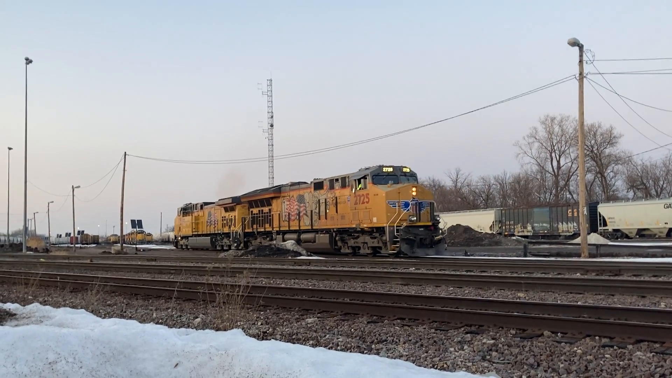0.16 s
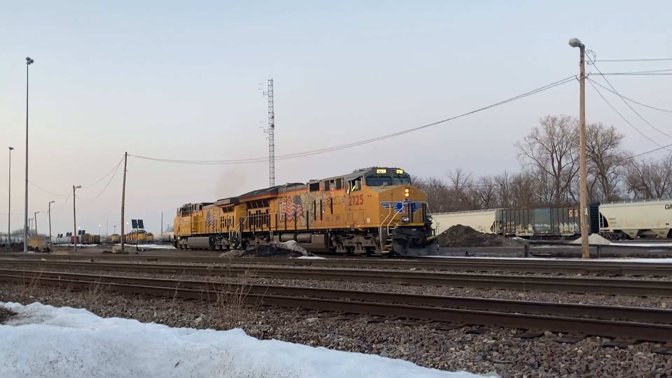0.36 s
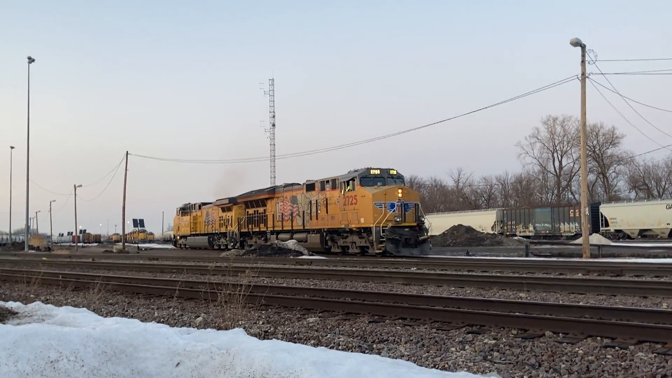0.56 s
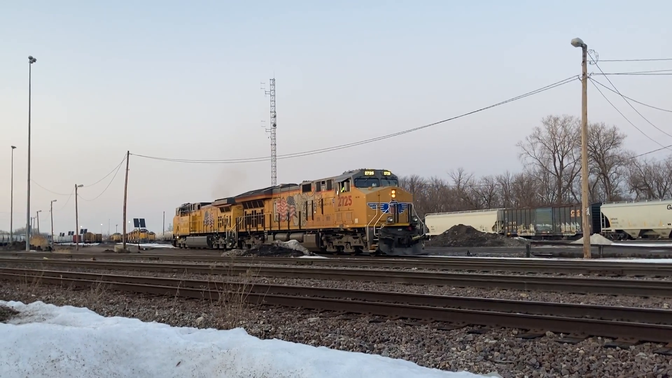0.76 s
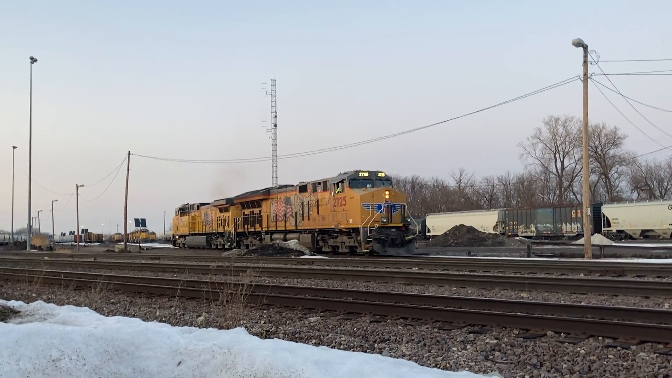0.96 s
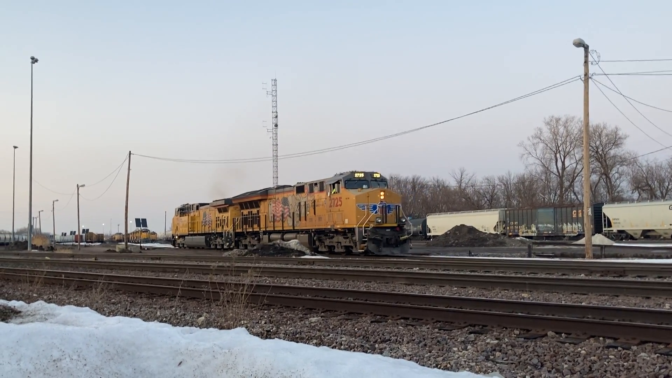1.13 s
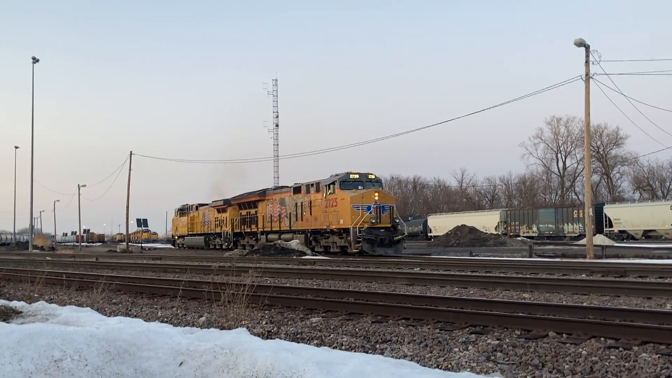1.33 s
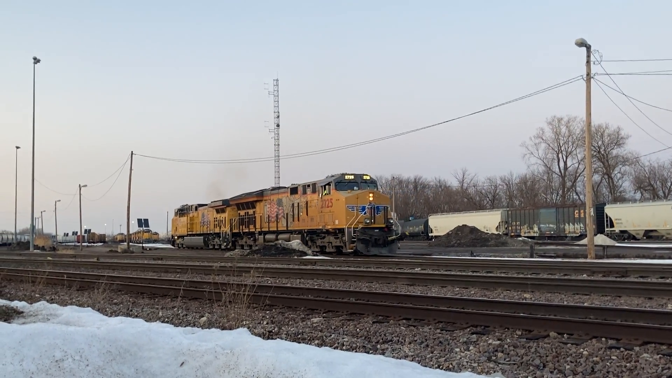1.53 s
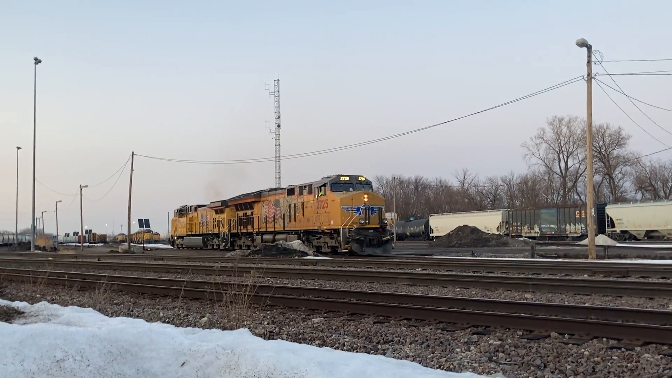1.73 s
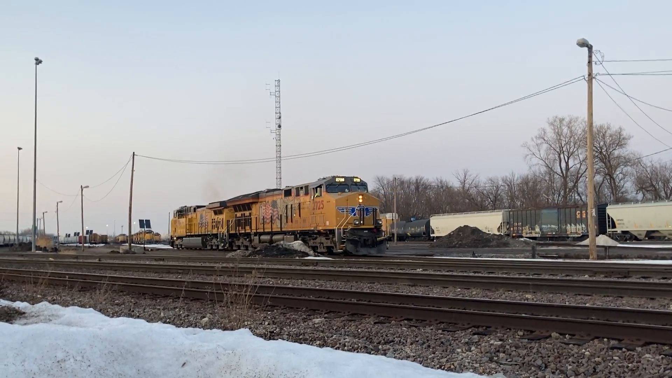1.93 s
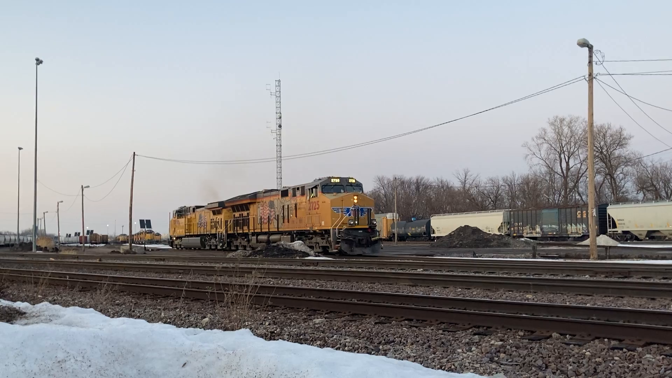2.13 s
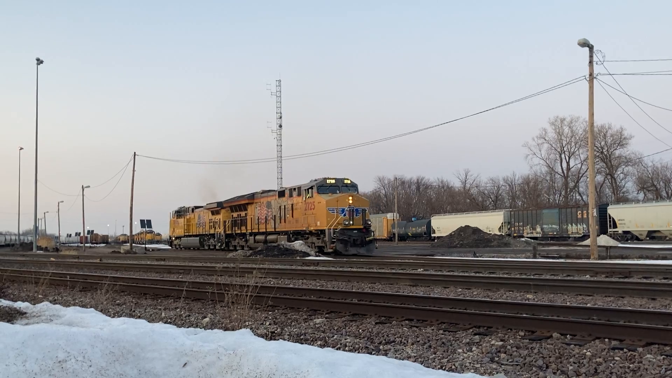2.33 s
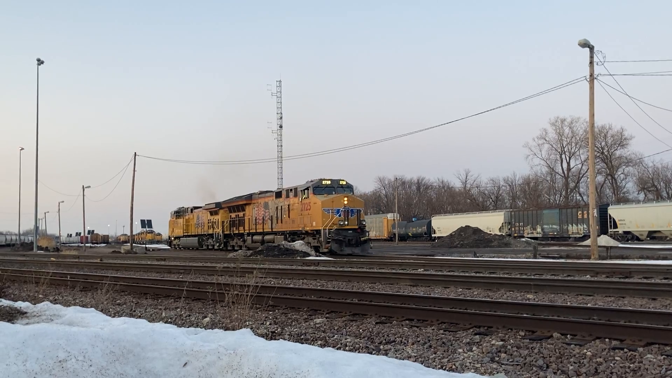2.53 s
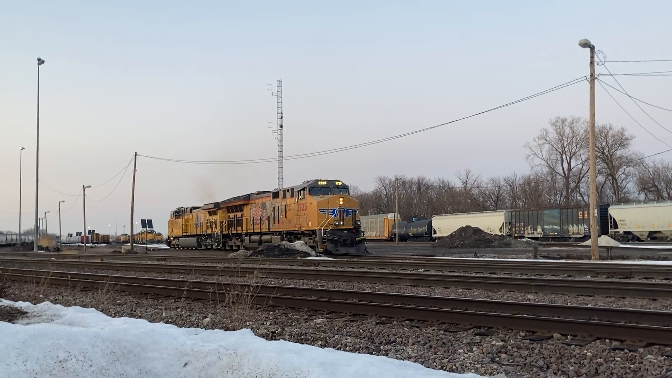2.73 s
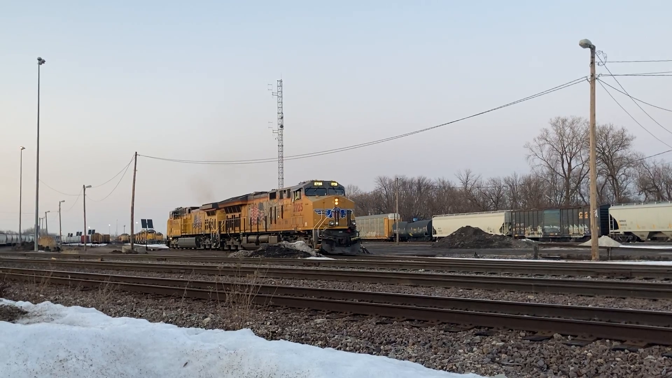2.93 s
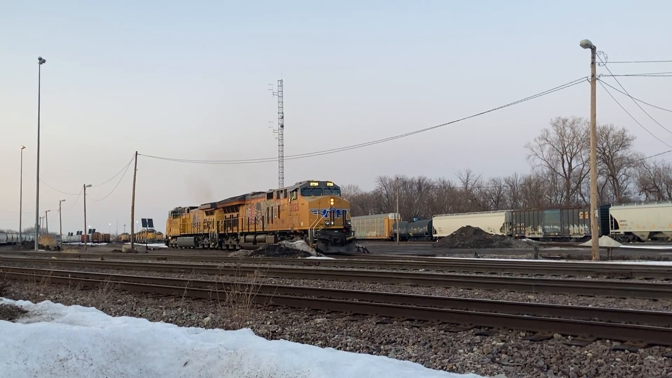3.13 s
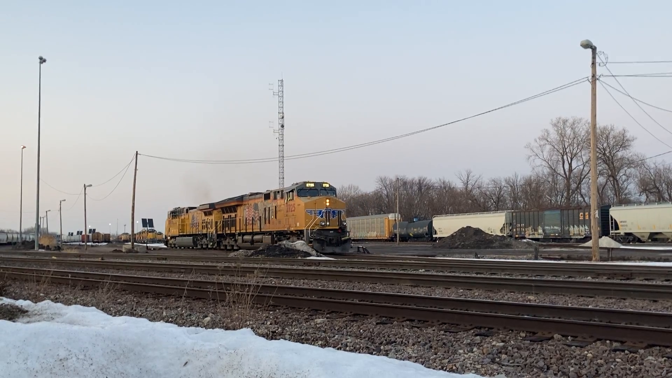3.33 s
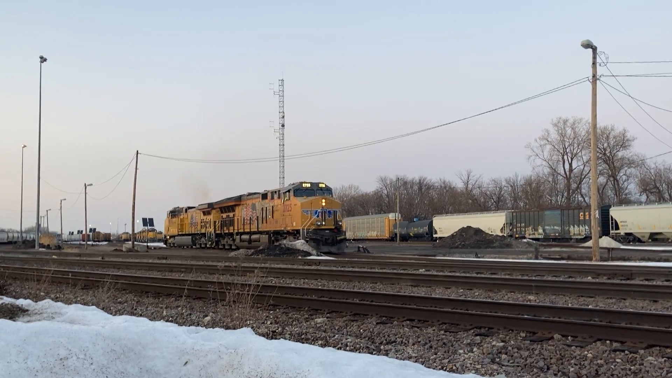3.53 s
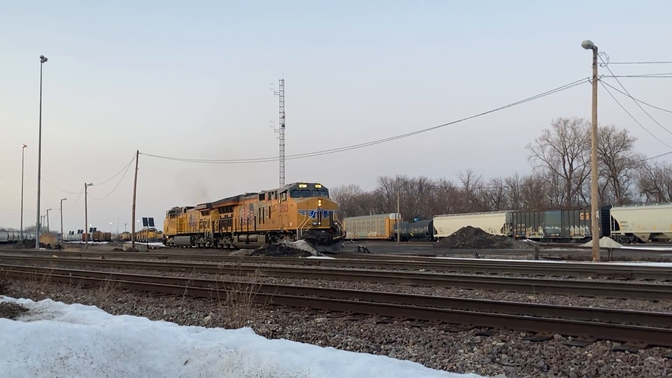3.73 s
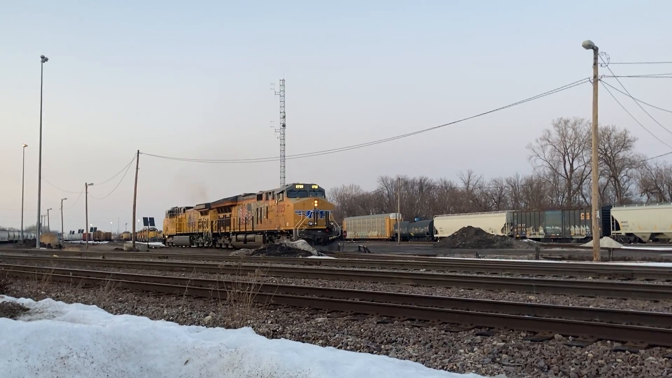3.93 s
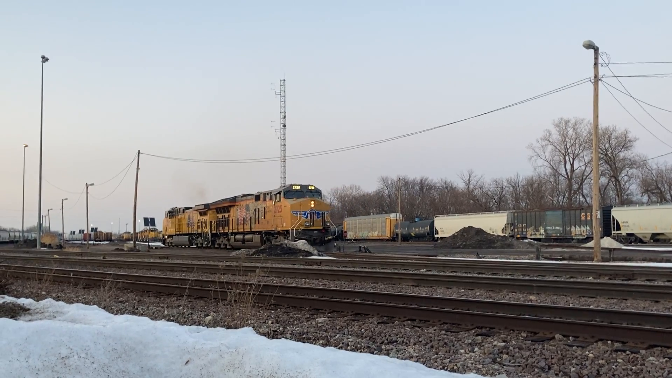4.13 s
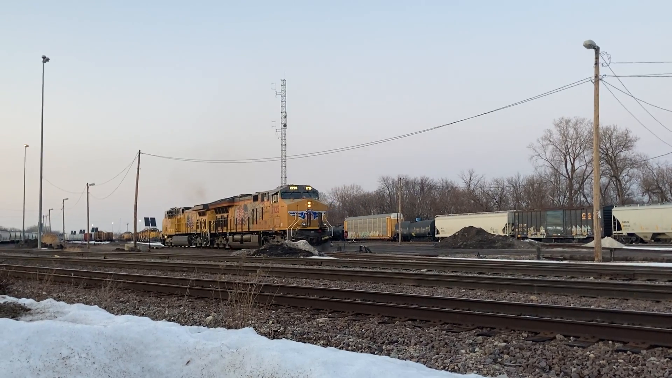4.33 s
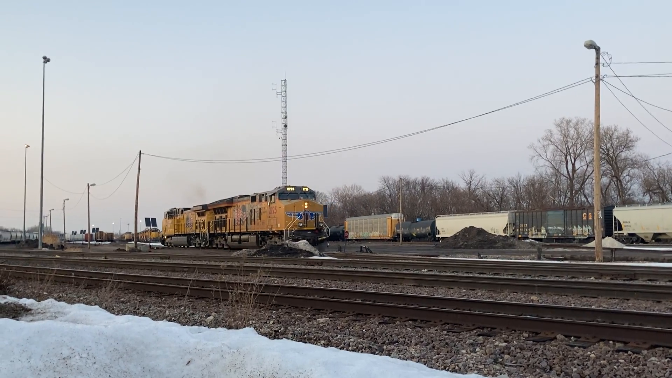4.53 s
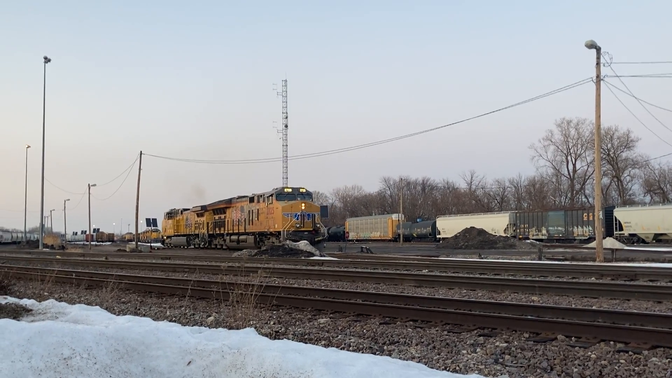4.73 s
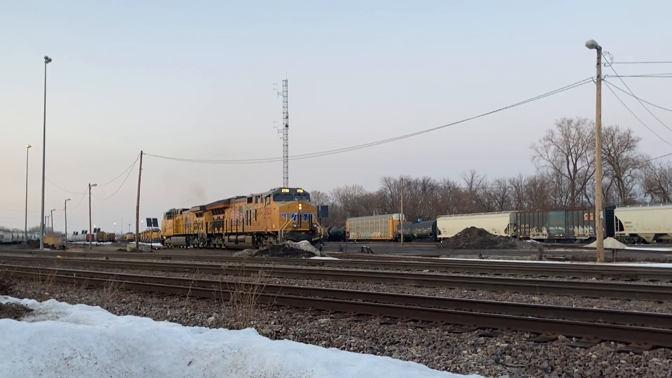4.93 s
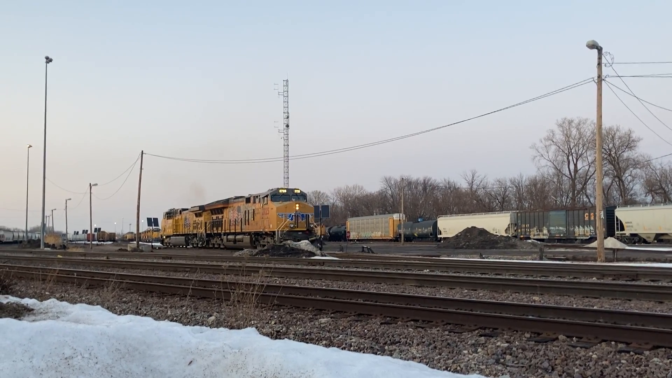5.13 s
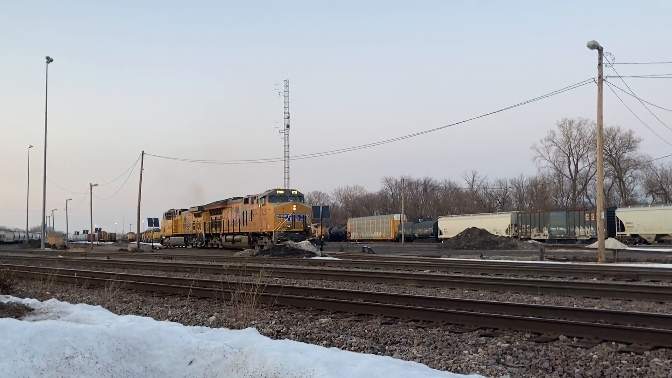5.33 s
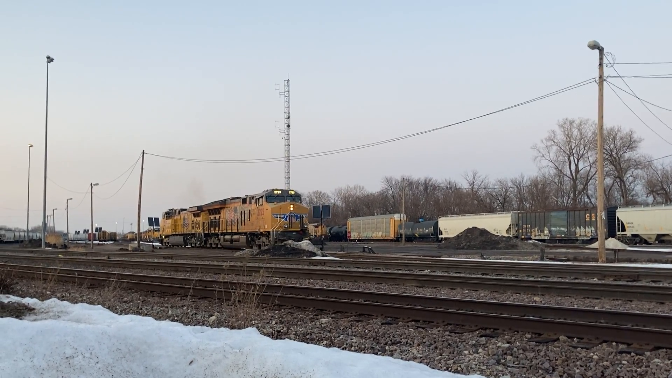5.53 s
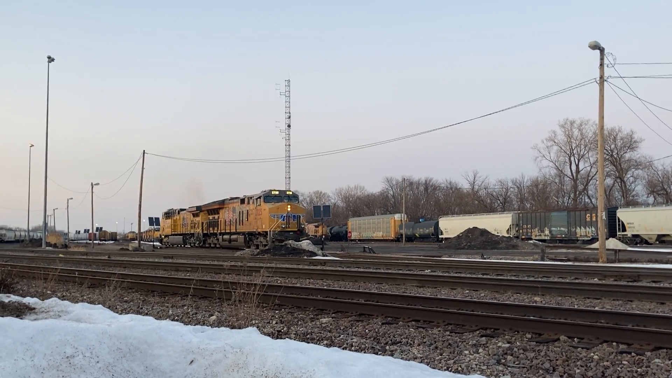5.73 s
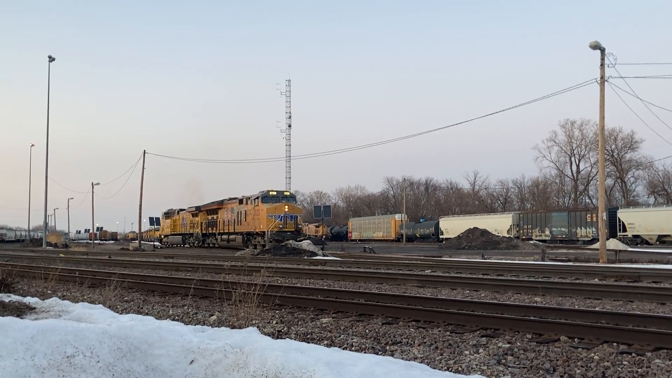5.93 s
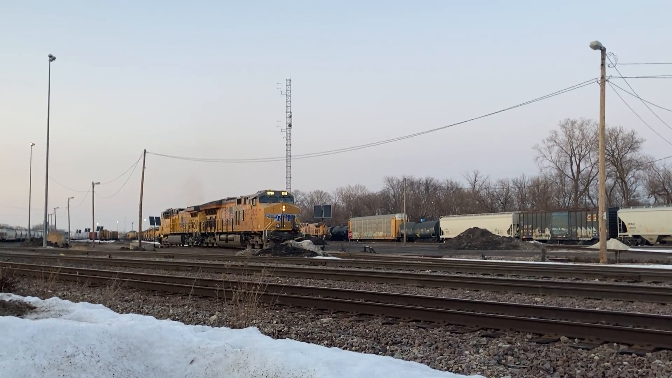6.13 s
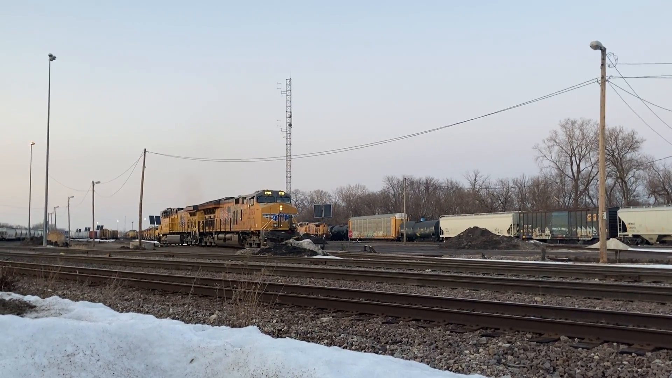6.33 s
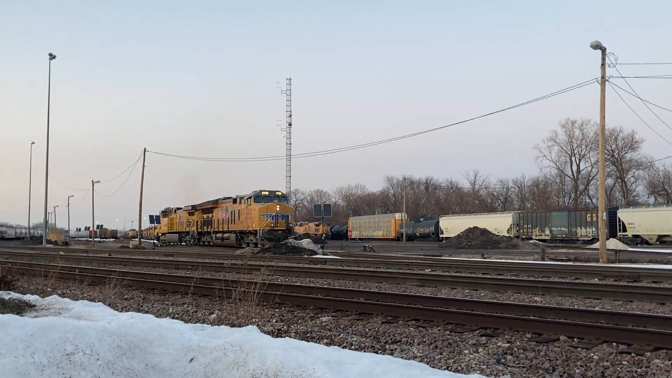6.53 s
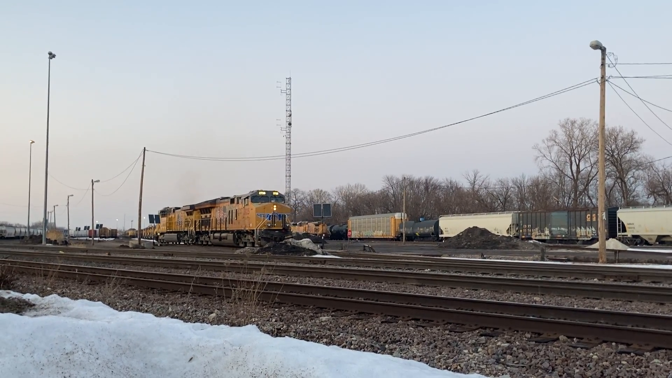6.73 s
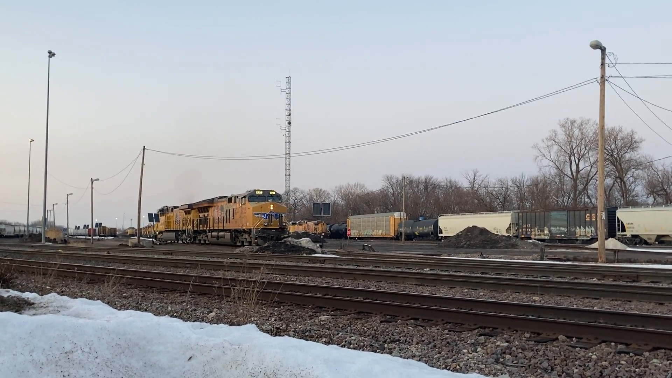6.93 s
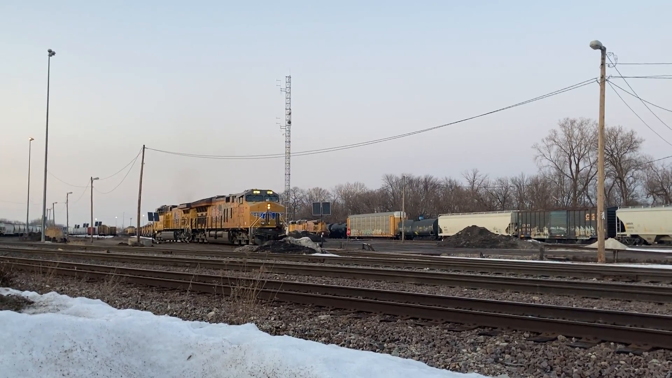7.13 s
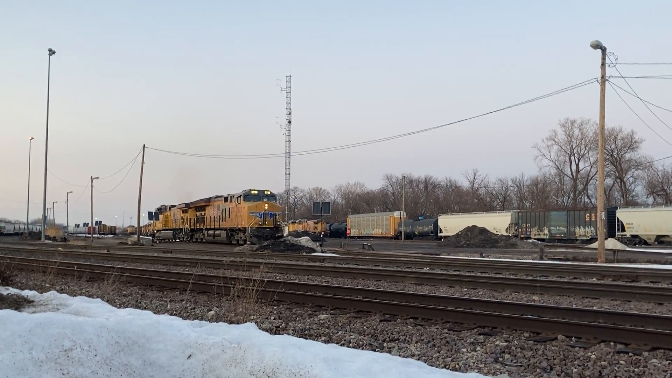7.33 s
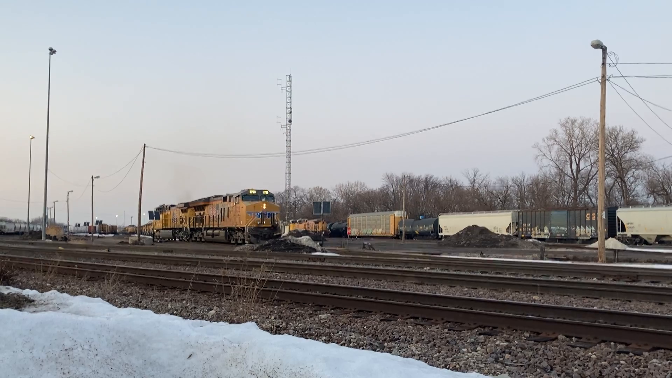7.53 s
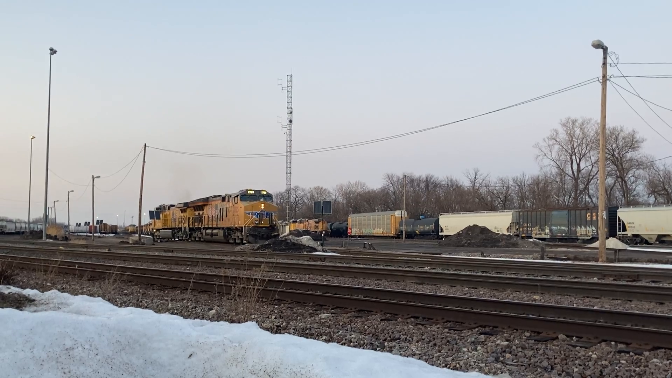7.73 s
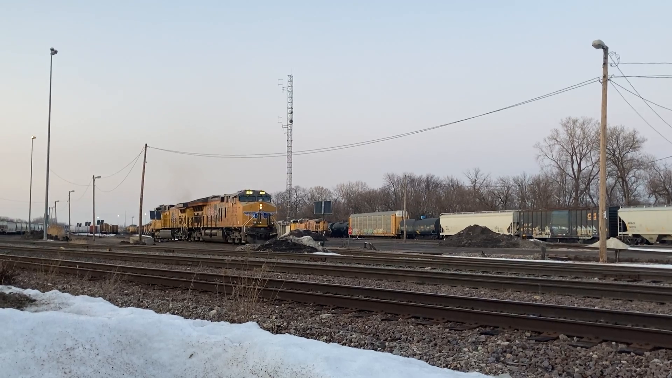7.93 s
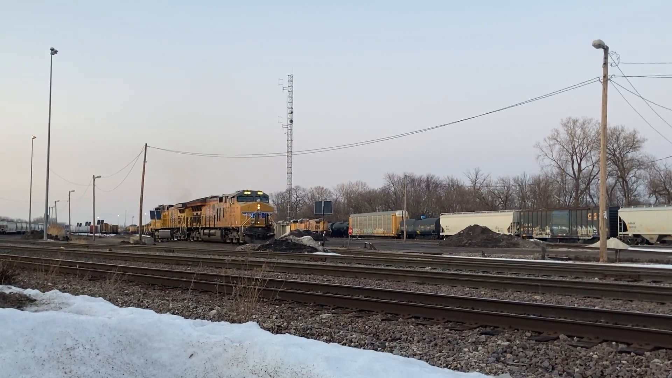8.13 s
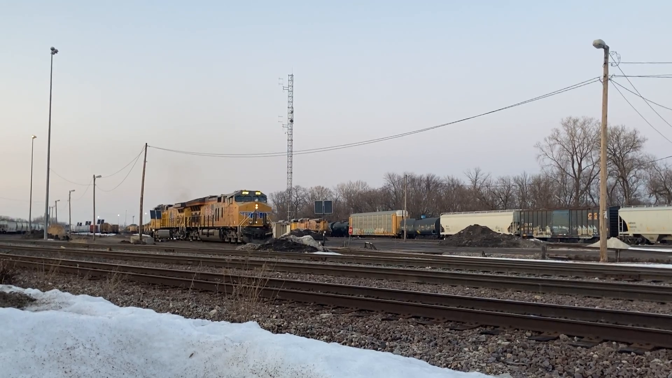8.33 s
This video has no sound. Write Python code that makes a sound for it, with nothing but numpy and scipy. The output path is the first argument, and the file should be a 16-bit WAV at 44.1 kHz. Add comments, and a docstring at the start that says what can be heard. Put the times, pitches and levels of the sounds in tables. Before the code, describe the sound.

From the first instant, two coupled diesel locomotives throb in an open rail yard, heard by a fixed stereo microphone pair as they roll slowly away. Low exhaust tones, strongest around 70 to 90 Hz, beat unevenly over a soft rumble; a rough fan roar, shimmering blower whines, airy hiss and a thin high turbocharger whistle lie above. Gritty wheel sizzle continues throughout. Flange scrapes come near 0.4 and 0.65 seconds, with a dull rail-joint knock and short squeal around 0.6 to 0.7. More scrapes cluster at 2 to 2.3, then near 4.2, 5 and faintly 6.4. Breathy high wheel singing passes around 4 and 5.3. Three small squeaks fall between 5.9 and 6.3, with knocks at about 6.4. Brief exhaust puffs come near 7.1 and 7.9, faint clinks around 7.5, and a stronger knock at 7.7. Roar and hiss gradually weaken; the engines still run at 8.4.

```python
"""Rail yard: two joined diesel locomotives roll slowly away, idling at slightly different speeds.
Their exhausts are sets of steady tones over a low rumble; they throb and beat against each other.
Blowers, fans and a turbocharger whine over hissing air and a roar, both made of shaped noise;
part of the roar repeats each engine cycle. Wheels grind, scrape, squeal, sing, knock and clink.
Two microphones hear it all, with the phase, level and likeness of left and right set by pitch."""
import sys
import numpy as np
from scipy.fft import rfft, irfft, next_fast_len
from scipy.io import wavfile
from scipy.ndimage import map_coordinates

SR = 44100
rng = np.random.default_rng(int(sys.argv[2]) if len(sys.argv) > 2 else 0)


def file_out(sig):
    """Save sig as 16-bit WAV at sys.argv[1]."""
    # one column per channel
    cols = np.atleast_2d(sig).T
    # limit, then scale
    lim = np.clip(cols, -1, 1)
    pcm = np.round(lim * 32767).astype(np.int16)
    wavfile.write(sys.argv[1], SR, pcm)


N = 369116

# Levels are those at the sources, before the microphone pair shapes left and right.
# Noise colours give relative level only: each noise is scaled to one strength before its level is set.
# A swell has fallen to 14 % of its peak at one length before or after its middle.

# how far off the locomotives are: t/s, distance (0 near, 1 far)
DISTANCE = [(0, 0.004), (2.1, 0.12), (3.2, 0.74), (4.5, 0.76), (5.6, 1), (8.37, 0.94)]

# exhaust tones of each engine: multiple of the engine cycle, near level/dB, far level/dB; the lead's multiple
# 33 (177.2 Hz) is not exhaust but the blower's fundamental, which runs locked to the lead engine
LEAD_EXHAUST = [(8, -45, -48), (9, -44, -35.5), (11, -43.5, -47), (14, -26, -38.5), (17, -41, -46),
                (18, -43, -44), (19, -40.5, -41), (20, -49, -48), (24, -51, -46.5), (31, -47.5, -53),
                (33, -47.5, -52)]
TRAIL_EXHAUST = [(5, -52, -51), (8, -43, -51), (9, -43, -47), (11, -37.5, -34), (12, -49, -43),
                 (13, -32, -37), (14, -29.5, -35), (15, -45, -41), (16, -40, -35.5), (20, -47, -45)]
LEAD_CYCLE_HZ, TRAIL_CYCLE_HZ = 5.369, 4.792
LEAD_THROB_S, TRAIL_THROB_S = 0.022, 0.0495  # time of each engine's first throb
# heavier exhaust puffs: middle t/s, length/s, rise/dB
HEAVY_PUFFS = [(.5, 0.67, 2), (3.2, 0.95, 2), (4.2, 1, 1.5), (4.8, 0.25, 1.5), (6.93, 0.036, 0),
               (7.14, 0.046, 6.5), (7.9, 0.063, 6.5), (8.07, 0.027, 5)]
# low rumble of the stacks: f/Hz, relative level/dB per Hz
RUMBLE_COLOUR = [(18, -25), (30, -22), (45, -6), (70, 4.5), (100, 0.5), (150, -9), (245, -15.5),
                 (480, -30.5)]
RUMBLE_DB = -30  # before the puffs lift it
# the lead engine's two firing tones: multiples of the engine cycle
FIRING_ORDERS = (15, 16)
# their slow swelling and fading: t/s, lower tone level/dB, upper tone level/dB
FIRING_LEVELS = [(0, -19.5, -45), (0.6, -16.5, -45), (1.3, -21.5, -30.5), (2.0, -17, -31.0),
                 (2.7, -21, -44), (3.3, -27.5, -32.5), (4.4, -24, -30.5), (5.5, -33.5, -37),
                 (6.5, -26.5, -35.5), (7.4, -29.5, -35.5), (8.3, -52, -34.5)]
# bursts of gas from the lead stack: f/Hz, relative level/dB per Hz
CHUG_COLOUR = [(90, -17), (125, 0.5), (175, -1), (205, -9), (245, -3.5), (300, -8.5), (360, -16.5),
               (520, -25)]
# strength of those bursts: t/s, level/dB
CHUG_LEVELS = [(0, -33), (1.5, -36.5), (2.6, -42.5), (3.15, -39.5), (3.8, -37), (4.3, -37.5), (5.1, -35.5),
               (6, -40), (7.1, -36.5), (7.5, -38.5), (8.1, -37.5)]

# fan roar, near and far: f/Hz, relative level/dB per Hz
ROAR_NEAR_COLOUR = [(210, -24), (300, -4), (520, -1), (600, -0.5), (1040, -0.5), (1320, -6.5), (1430, -0.5),
                    (1490, -10), (1810, -3), (2200, -16.5), (2470, -8), (2990, -15.5), (3449, -75)]
ROAR_FAR_COLOUR = [(210, -18), (300, -5.5), (500, -5.0), (600, -1.5), (970, -1), (1040, -0.5), (1490, -9),
                   (1600, -3), (1810, -8.5), (2020, -16), (2370, -7.5), (2770, -25), (2990, -18.5),
                   (3449, -67)]
# hiss of air, near and far: f/Hz, relative level/dB per Hz
HISS_NEAR_COLOUR = [(2300, -20), (3000, -6.5), (3500, 4.5), (4030, -4.5), (4550, -3), (4900, -1.5),
                    (5250, -3.5), (5600, -1.5), (7000, -14.5), (9500, -36)]
HISS_FAR_COLOUR = [(2300, -24), (3000, 4.5), (3430, -1.5), (3710, -6), (3920, -2.5), (4860, -3.5),
                   (5250, -7.5), (5850, -8), (6010, -9.5), (7000, -8), (9500, -17)]
# power share of the roar that repeats each engine cycle: f/Hz, share (0-1)
LEAD_REPEAT_SHARE = [(200, .2), (400, .42), (780, .42), (950, .05)]
TRAIL_REPEAT_SHARE = [(780, .03), (950, .3), (1300, .25), (2000, 0)]
# valve gear and injectors chattering with the trailing engine: multiple of its cycle, depth (share of level)
VALVE_CHATTER = [(3, .05), (7, .055), (9, .065), (15, .07), (19, .05), (22, .04)]
CHATTER_TOP_HZ = 1600
# brief dips of the roar, hiss and sizzle: middle t/s, length/s, rise/dB (negative)
DIPS = [(2.75, 0.49, -1.2)]
# level at the start (dB) and steady fall (dB per second)
ROAR_DB, ROAR_FALL_DB_PER_S = -30, 0.8
HISS_DB, HISS_FALL_DB_PER_S = -43.5, 0.82
SIZZLE_DB, SIZZLE_FALL_DB_PER_S = -49, 1.8
TURBO_DB, TURBO_FALL_DB_PER_S = -59, 1.5

# blower whine: multiple of the shaft rate, near level/dB, far level/dB
BLOWER_TONES = [(4, -49, -67), (5, -48, -51.5), (7, -45.5, -57), (8, -49.5, -55), (9, -56, -53),
                (10, -46.5, -53.5), (11, -52, -64), (14, -55, -62.5), (15, -55, -65)]
BLOWER_HZ = 177.2  # shaft rate
# cooling fan tones: f/Hz, width/Hz, near level/dB, far level/dB
FAN_TONES = [(461, 14, -51, -54.5), (529, 12, -49, -56), (619.3, 28, -44.5, -47.5), (885.6, 12, -49, -47),
             (1047, 10, -51, -50), (1566, 5, -50, -55.5)]
# the three clearest tones: pitch, then the low level each one rises from
BLADE_ORDER, GEAR_HZ, MOTOR_HZ = 13, 1016, 1064  # the blade tone is a multiple of the blower shaft
BLADE_DB, GEAR_DB, MOTOR_DB = -58, -50.5, -54
# their rises: middle t/s, length/s, rise/dB
BLADE_RISES = [(.42, .25, 8.8), (1.03, .12, 7.7), (1.65, 0.48, 9.3), (2.45, .14, 11), (2.9, .15, 7.9),
               (3.38, .17, 10.4), (3.8, .14, 10), (4.2, 0.11, 13.5), (4.97, 0.15, 16), (5.45, 0.32, 8.8),
               (5.85, 0.38, 11), (6.15, 0.22, 6), (6.45, 0.23, 11.4), (7.0, 0.2, 10.5)]
GEAR_RISES = [(.25, .3, 4), (1.5, 0.5, 6), (2.1, 0.35, 7), (4.0, .5, 4), (5.08, 0.3, 7), (5.6, .4, 10.5),
              (6.35, 0.55, 9.5), (7.3, .6, 2)]
MOTOR_RISES = [(.17, .2, 16), (1.45, 0.45, 6), (7.6, 0.28, 9), (8.15, 0.32, 6.8)]
TWINKLE_RAD, TWINKLE_DB = 0.45, 0.8  # how far moving air jitters the phase and level of each tone
HUM_S, HUM_LENGTH_S, HUM_DB = 3.4, 0.98, -48.5  # a passing low hum: middle, length, peak level

# wavering tones in the roar: f/Hz, level/dB
WAVERING_TONES = [(950, -50.5), (1105, -48.5), (1150, -48.5)]
STRAND_WANDER_HZ, STRAND_TURNS_PER_S, STRAND_WIDTH_HZ, STRAND_FADE_DB = 24, 11, 32, 2.5
TURBO_HZ, TURBO_SAG_HZ, TURBO_WIDTH_HZ = 6670, 60.2, 65  # near pitch, drop when far, width

# gritty sizzle of the wheels: f/Hz, relative level/dB per Hz
SIZZLE_COLOUR = [(4500, -30), (6400, -4), (7400, 0.5), (8300, 1), (9300, -2), (10200, -4), (11800, -7),
                 (13300, -11.5), (14500, -19), (16000, -30)]
SIZZLE_SHADE_DB = 1.5  # further loss when far
# harder grinding: middle t/s, length/s, rise/dB
HARD_GRINDS = [(.45, 0.49, 1.5), (2.0, .2, 4), (4.0, 0.56, 3), (5.25, 0.67, 4), (6.4, 0.96, 2)]
# wheel flanges scraping the rail: middle t/s, length/s, level/dB
FLANGE_SCRAPES = [(0.38, 0.048, -43), (.65, 0.095, -41.5), (1.958, .03, -41), (2.035, .025, -45),
                  (2.195, 0.018, -44), (2.235, 0.035, -42), (2.34, 0.085, -52), (4.187, 0.093, -41.5),
                  (4.984, 0.096, -44.5), (6.42, 0.13, -48)]
# their colour: f/Hz, relative level/dB per Hz
SCRAPE_COLOUR = [(1200, -11), (2400, 10.5), (4500, 4), (9000, -2.5), (13000, -18), (16000, -36)]
# short wheel squeals: middle t/s, length/s, f/Hz, level/dB
WHEEL_SQUEALS = [(0.718, 0.12, 1816, -40), (2.335, .05, 11750, -57), (5.934, 0.039, 1260, -38),
                 (6.13, 0.038, 1266, -38.5), (6.298, .05, 1307, -40)]
# wheels singing, a high and breathy ring: middle t/s, length/s, level/dB
WHEEL_SINGING = [(3.9, .3, -56.5), (4.35, .35, -62), (5.3, .9, -57)]
SING_HZ, SING_WIDTH_HZ = 6590, 190
# wheels knocking over rail joints: t/s, level/dB
JOINT_KNOCKS = [(.63, -28.5), (5.92, -41), (6.35, -29.5), (6.41, -30), (7.7, -27)]
# colour of the knocked wheel frames: f/Hz, relative level/dB per Hz
KNOCK_COLOUR = [(100, -10), (200, 0.5), (290, 3.5), (400, -8.5), (1500, -35), (5000, -50)]
# loose steel fittings clinking: t/s, level/dB
FITTING_CLINKS = [(7.482, -53), (7.558, -57), (7.641, -58)]
# their colour: f/Hz, relative level/dB per Hz
CLINK_COLOUR = [(3500, -27), (5000, -5), (5700, 0), (6400, -2), (8000, -20), (10000, -35)]

# phase by which the left microphone leads: f/Hz, phase/rad
LEFT_LEAD = [(100, 0), (300, 0.72), (550, 1.87), (700, 2), (900, 5.2), (1300, 6.5), (1700, 8.1), (2200, 7),
             (2750, 7.2), (2950, 10.3), (3900, 8.5), (4100, 11.5), (4700, 13.6), (5000, 15.3), (6100, 15.6),
             (6400, 12.4), (7500, 11.9), (9150, 9.4), (11000, 6.4), (12200, 6), (13100, 3.3), (14400, 3),
             (15000, .6)]
# how alike the two microphones sound: f/Hz, likeness (0-1)
LIKENESS = [(80, 0.98), (300, 0.78), (620, 0.77), (780, 0.22), (1100, 0.95), (2000, 0.26), (2400, 0.98),
            (3000, 0.45), (3600, 0.46), (4100, 0.41), (5100, 0.76), (5900, 0.74), (6500, 0.62),
            (7200, 0.64), (9200, 1), (10400, 0.98), (11500, 0.53), (12500, .7), (13500, 0.99)]
# level difference between them: f/Hz, left minus right level/dB
LEFT_RIGHT_LEVEL = [(60, -4), (170, -4), (300, -2), (580, 2), (740, 5.5), (1080, -3.5), (1800, -0.5),
                    (2500, -3), (3400, 2), (4800, -2), (9000, 0)]
TOP_HZ = 15150  # nothing is kept at or above this
EDGE_S = 0.012  # easing in and out of the exhaust


def amp(db):
    """Turn decibels into a multiplier."""
    return 10 ** (np.asarray(db) / 20)


def unit(x):
    """Scale a sound to an average strength (rms) of 1."""
    return x / np.sqrt(np.mean(x ** 2) + 1e-20)


def clock():
    """Give the time of each sample in seconds."""
    return np.arange(N) / SR


def along(points, hz):
    """Join (f/Hz, value) points by straight lines on a logarithmic pitch axis."""
    f, value = np.transpose(points)
    return np.interp(np.log(hz + 1), np.log(f), value)


def curves(rows):
    """Turn each column after the time into one value per sample."""
    s, *columns = np.transpose(rows)
    return [np.interp(clock(), s, column) for column in columns]


def wobble(rate):
    """Make a smooth random curve with `rate` random points a second."""
    coarse = clock()[::64]
    knots = rng.standard_normal(int(N * rate / SR) + 4)
    smooth = map_coordinates(knots, [coarse * rate])
    return np.interp(clock(), coarse, smooth)


def filtered(x, response):
    """Change level and phase pitch by pitch, with a complex response of frequency."""
    size = next_fast_len(N + 8192, True)  # spare room so the end does not wrap to the start
    hz = np.fft.rfftfreq(size, 1 / SR)
    return irfft(rfft(x, size) * response(hz), size)[..., :N]


def noise(colour, source=None):
    """Make two noises of one colour, for direct and scattered sound; nothing lies outside its range."""
    if source is None:
        source = rng.standard_normal((2, N))
    lowest, highest = colour[0][0], colour[-1][0]

    def response(hz):
        return amp(along(colour, hz)) * ((hz > lowest) & (hz < highest))
    return unit(filtered(source, response))


def narrow(hz, width_hz):
    """Make a fuzzy tone, steady or gliding: random sine and cosine strengths spread its pitch."""
    turn = 2 * np.pi * np.cumsum(hz * np.ones(N)) / SR
    paths = [wobble(width_hz) * np.sin(turn) + wobble(width_hz) * np.cos(turn) for _ in range(2)]
    return unit(np.array(paths))  # direct and scattered


def swell(s, length):
    """Make a bell-shaped rise and fall around time s."""
    return np.exp(-2 * ((clock() - s) / length) ** 2)


def rises(rows):
    """Add up decibel swells given as middle, length and rise."""
    return sum(rise_db * swell(s, length) for s, length, rise_db in rows)


def receding(start_db, fall_db_per_s):
    """Lower a decibel level steadily as the locomotives roll away."""
    return start_db - fall_db_per_s * clock()


def exhaust(lines, cycles, away, fade_db, scatter, direct_db):
    """Unequal cylinders repeat every engine cycle: tones at its multiples throb at the cycle rate."""
    out = np.zeros(N)
    for order, near_db, far_db in lines:
        # echoes off ground and cars make tones fade; those weaker than direct_db also shift in phase
        shift = scatter * max(direct_db - near_db, 0) * wobble(0.43)
        level_db = near_db + (far_db - near_db) * away + fade_db * wobble(0.864)
        out += amp(level_db) * np.sqrt(2) * np.cos(2 * np.pi * order * cycles + shift)
    return out


def chug(cycles, pulse_db=3, uneven_db=1.5):
    """Gas leaves the lead stack in uneven bursts of noise, one each engine cycle."""
    level_db, = curves(CHUG_LEVELS)
    bursts = amp(pulse_db * np.cos(2 * np.pi * cycles) + uneven_db * wobble(7))
    return amp(level_db) * unit(bursts * noise(CHUG_COLOUR))


def boom(cycles):
    """The lead engine's two firing tones swell and fade slowly, each in its own way."""
    out = np.zeros(N)
    for order, level_db in zip(FIRING_ORDERS, curves(FIRING_LEVELS)):
        out += amp(level_db) * np.sqrt(2) * np.cos(2 * np.pi * order * cycles)
    return out


def engines(away):
    """Both exhausts sound over the turbulent rumble of their stacks; puffs lift tones and rumble together."""
    lead_cycles = LEAD_CYCLE_HZ * (clock() - LEAD_THROB_S)
    trail_cycles = TRAIL_CYCLE_HZ * (clock() - TRAIL_THROB_S)
    lead = exhaust(LEAD_EXHAUST, lead_cycles, away, fade_db=1, scatter=0.12, direct_db=-35)
    trail = exhaust(TRAIL_EXHAUST, trail_cycles, away, fade_db=1, scatter=0.12, direct_db=-34)
    effort = amp(rises(HEAVY_PUFFS))
    rumble = amp(RUMBLE_DB) * noise(RUMBLE_COLOUR)
    direct = boom(lead_cycles) + effort * (lead + trail)
    tones = np.array([direct, np.zeros(N)])  # the tones have no scattered part
    return effort * rumble + chug(lead_cycles) + tones


def repeating(cycle_hz):
    """The jumble of knocks in one engine cycle comes round again and again, as looped noise."""
    size = round(SR / cycle_hz)
    return rng.standard_normal((2, size))[:, np.arange(N) % size]


def clatter():
    """Turbulence and each engine's repeating knocks excite the roar; its lower part chatters."""
    turbulence = rng.standard_normal((2, N))
    parts = np.array([turbulence, repeating(LEAD_CYCLE_HZ), repeating(TRAIL_CYCLE_HZ)])

    def shares(hz):
        lead, trail = along(LEAD_REPEAT_SHARE, hz), along(TRAIL_REPEAT_SHARE, hz)
        return np.sqrt([1 - lead - trail, lead, trail])[:, None]  # root turns power into level
    mix = filtered(parts, shares).sum(axis=0)
    chatter = np.zeros(N)
    for order, depth in VALVE_CHATTER:
        chatter += depth * np.cos(2 * np.pi * (order * TRAIL_CYCLE_HZ * clock() + rng.random()))
    return mix + chatter * filtered(mix, lambda hz: hz < CHATTER_TOP_HZ)


def machinery(away, flutter_db=0.5):
    """Fan roar, diesel clatter and hissing air: the ground echo shifts their colour with distance."""
    far = np.clip(away, 0, 1)
    drive = clatter()
    roar = (1 - far) * noise(ROAR_NEAR_COLOUR, drive) + far * noise(ROAR_FAR_COLOUR, drive)
    hiss = np.sqrt(1 - far) * noise(HISS_NEAR_COLOUR) + np.sqrt(far) * noise(HISS_FAR_COLOUR)
    roar_db = receding(ROAR_DB, ROAR_FALL_DB_PER_S) + flutter_db * wobble(16)
    hiss_db = receding(HISS_DB, HISS_FALL_DB_PER_S)
    return amp(rises(DIPS)) * (amp(roar_db) * roar + amp(hiss_db) * hiss)


def blowers(away, fade_db=2.4, drift=0.25):
    """Clean spinning tones twinkle in the moving air, with fuzzier fan tones and a passing hum."""
    shaft = 2 * np.pi * BLOWER_HZ * clock() + drift * wobble(1.5)  # drift in radians
    tones = []
    for order, near_db, far_db in BLOWER_TONES:
        level_db = near_db + (far_db - near_db) * away + fade_db * wobble(8)
        tones.append((order * shaft, level_db))
    tones.append((BLADE_ORDER * shaft, BLADE_DB + rises(BLADE_RISES)))
    tones.append((2 * np.pi * GEAR_HZ * clock(), GEAR_DB + rises(GEAR_RISES)))
    tones.append((2 * np.pi * MOTOR_HZ * clock(), MOTOR_DB + rises(MOTOR_RISES)))
    out = np.zeros((2, N))
    for phase, level_db in tones:
        for path in out:  # direct and scattered sound twinkle separately
            twinkling = np.sin(phase + TWINKLE_RAD * wobble(6.5))
            path += amp(level_db + TWINKLE_DB * wobble(11)) * np.sqrt(2) * twinkling
    for hz, width_hz, near_db, far_db in FAN_TONES:
        out += amp(near_db + (far_db - near_db) * away) * narrow(hz, width_hz)
    hum = swell(HUM_S, HUM_LENGTH_S) * narrow(2 * BLOWER_HZ, width_hz=18)
    return out + amp(HUM_DB) * hum


def strands():
    """Faint tones waver in pitch inside the roar, each growing and fading at random."""
    out = np.zeros((2, N))
    for hz, level_db in WAVERING_TONES:
        pitch_hz = hz + STRAND_WANDER_HZ * wobble(STRAND_TURNS_PER_S)
        glide = narrow(pitch_hz, STRAND_WIDTH_HZ)
        out += amp(level_db) * unit(glide * amp(STRAND_FADE_DB * wobble(5)))
    return out


def turbo(away, wander_hz=16, flutter_db=2.5):
    """The turbocharger's thin whistle wavers, sags a little in pitch and fades."""
    pitch_hz = TURBO_HZ - TURBO_SAG_HZ * away + wander_hz * wobble(4)
    level_db = receding(TURBO_DB, TURBO_FALL_DB_PER_S) + flutter_db * wobble(7.6)
    return amp(level_db) * narrow(pitch_hz, TURBO_WIDTH_HZ)


def struck(hits, colour, attack, t60):
    """Struck, damped steel rises quickly (attack in s), then dies away by 60 dB every t60 seconds."""
    envelope = np.zeros(N)
    for s, level_db in hits:
        since = np.maximum(clock() - s, 0)
        envelope += amp(level_db - 60 * since / t60) * (1 - np.exp(-since / attack))
    return envelope * noise(colour)


def wheels(away, grain_db=1.34, flutter_db=0.7):
    """Steel on steel: gritty sizzle, flange scrapes, squeals, singing, dull joint knocks and light clinks."""
    grit_db = grain_db * wobble(70) + flutter_db * wobble(13)
    sizzle_db = receding(SIZZLE_DB, SIZZLE_FALL_DB_PER_S) - SIZZLE_SHADE_DB * away
    sizzle_db = sizzle_db + rises(HARD_GRINDS) + rises(DIPS) + grit_db
    sizzle = amp(sizzle_db) * noise(SIZZLE_COLOUR)
    scrape_level = sum(amp(db) * swell(s, length) for s, length, db in FLANGE_SCRAPES)
    scrapes = scrape_level * noise(SCRAPE_COLOUR)
    squeals = np.zeros((2, N))
    for s, length, hz, db in WHEEL_SQUEALS:
        squeals += amp(db) * swell(s, length) * narrow(hz, width_hz=0.054 * hz)
    sing_level = sum(amp(db) * swell(s, length) for s, length, db in WHEEL_SINGING)
    singing = sing_level * narrow(SING_HZ, SING_WIDTH_HZ)
    knocks = struck(JOINT_KNOCKS, KNOCK_COLOUR, attack=0.0021, t60=0.27)
    clinks = struck(FITTING_CLINKS, CLINK_COLOUR, attack=0.0008, t60=0.12)
    return sizzle + scrapes + squeals + singing + knocks + clinks


def microphones(pair):
    """Direct sound is shared, scattered sound has opposite signs; left then leads right in phase."""
    def blend(hz):
        angle = np.arccos(np.clip(along(LIKENESS, hz), 0, 1)) / 2
        return np.array([np.cos(angle), np.sin(angle)])

    def sides(hz):
        # each side takes half of the level and phase difference
        half = amp(along(LEFT_RIGHT_LEVEL, hz) / 2) * np.exp(0.5j * along(LEFT_LEAD, hz))
        return np.array([half, 1 / half])
    direct, scattered = filtered(pair, blend)
    return filtered(np.array([direct + scattered, direct - scattered]), sides)


def scene():
    """The locomotives recede from the microphones; only the exhaust eases in and out at the ends."""
    away, = curves(DISTANCE)
    to_nearest_end = np.minimum(clock(), clock()[::-1])
    edges = np.sin(np.pi / 2 * np.clip(to_nearest_end / EDGE_S, 0, 1)) ** 2
    pair = edges * engines(away) + machinery(away) + blowers(away)
    pair = pair + strands() + turbo(away) + wheels(away)
    return microphones(pair)


def record(dry):
    """Keep only the sound below the top frequency."""
    return filtered(dry, lambda hz: hz < TOP_HZ)


dry = scene()
out = record(dry)
file_out(out)
```